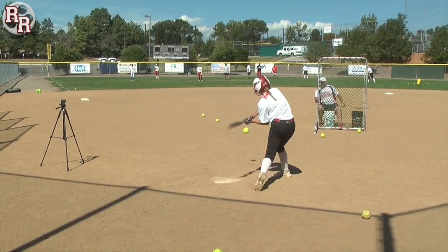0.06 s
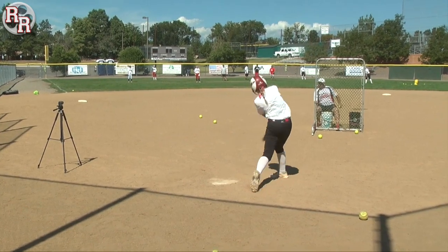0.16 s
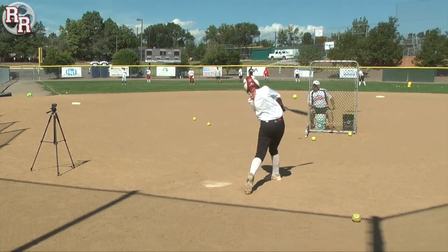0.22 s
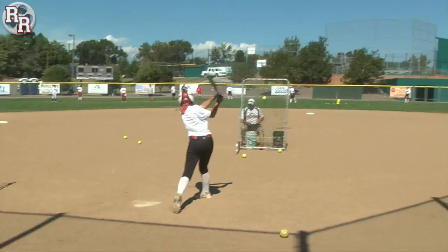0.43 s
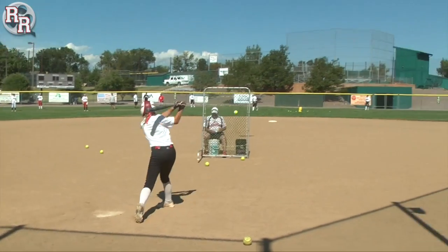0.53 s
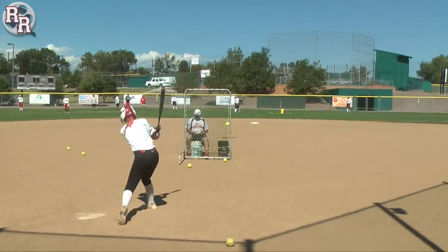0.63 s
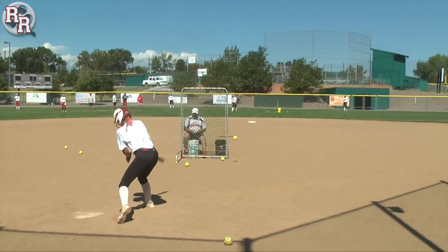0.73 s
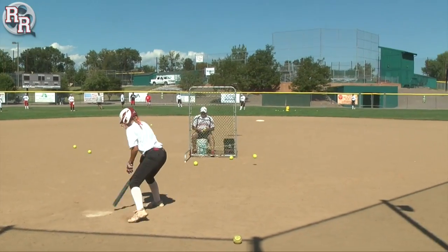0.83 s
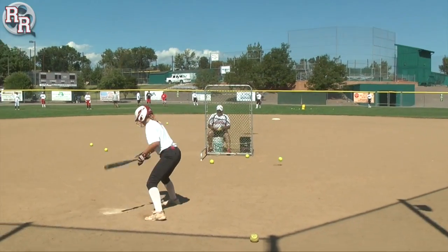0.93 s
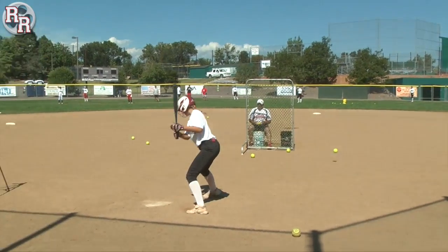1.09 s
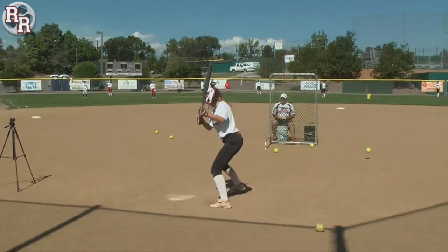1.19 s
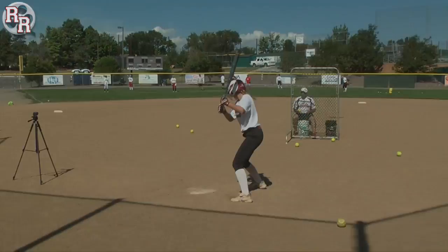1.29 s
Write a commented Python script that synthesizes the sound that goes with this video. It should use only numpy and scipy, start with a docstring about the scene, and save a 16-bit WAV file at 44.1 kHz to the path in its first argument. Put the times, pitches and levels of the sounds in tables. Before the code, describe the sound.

A bat hits a softball with a loud, close crack and a brief ring on an open field. A sharp knock follows, loose metal fence fittings jingle, and something thuds softly on dirt over a faint hum.

```python
"""A softball bat cracks against the ball on an open dirt field, hot enough to overload a nearby mic.
The crack layers ringing barrel modes, the ball's dull push and a burst of contact noise; the backstop
slaps it back and the field adds a diffuse tail. A sharp knock follows, two loose metal fittings jingle
over dry rustles and shivering wire mesh, and something thuds on the dirt.
Under it all sits a bed of low motor hum, distant outdoor noise and a faint whirr."""
import sys
import numpy as np
from scipy import signal
from scipy.fft import rfft, irfft
from scipy.io import wavfile

SR = 44100
rng = np.random.default_rng(int(sys.argv[2]) if len(sys.argv) > 2 else 0)


def waveform_to_disk(signal):
    """Save audio, clipped to [-1, 1], as 16-bit WAV at the path in sys.argv[1]."""
    frames = np.transpose(np.atleast_2d(signal))
    scaled = np.clip(frames, -1, 1) * 32767
    samples = np.round(scaled).astype(np.int16)
    wavfile.write(sys.argv[1], SR, samples)


N = 59535
T = np.arange(N) / SR

# motor hum partials (harmonic number, level [dB])
HUM_PARTIALS = [(1, -51.5), (2, -50), (3, -50), (4, -56), (5, -54)]
# colours of the outdoor air and the distant whirr (frequency [Hz], relative density [dB])
AIR_COLOUR = [(20, -18.5), (40, -14), (60, -4), (115, 3.5), (170, -3), (270, 3.5), (480, -5.5), (720, -5),
              (1100, -13), (1500, -19.5), (2000, -21), (4000, -34), (8000, -44), (15000, -47.5)]
WHIRR_COLOUR = [(900, -35), (1250, -11), (1430, -7), (1560, -4.5), (1700, -16), (2300, -42)]
# fader rides for the air and the whirr (time [s], level [dB])
AIR_RIDE = [(0, -43), (.2, -42), (.5, -45.5), (.72, -45.5), (.9, -44.5), (1.08, -42.5), (1.22, -43.5),
            (1.35, -48)]
WHIRR_RIDE = [(0, -54.5), (.2, -52), (.55, -54.5), (.7, -60.5), (.98, -65), (1.12, -59), (1.28, -58.5),
              (1.35, -78)]
# colours of mesh hiss, scrapes and grit, and knocks (frequency [Hz], relative density [dB])
MESH_COLOUR = [(500, -16), (1300, -5), (2000, 5), (3300, 4), (4600, 0), (6000, -6.5), (10000, -20.5),
               (15000, -26)]
GRIT_COLOUR = [(300, -9.5), (900, -3.5), (2000, -1.5), (3500, 2.5), (5300, 2.5), (7500, 3.5), (10500, -5.5),
               (13000, -18.5), (16000, -25.5)]
KNOCK_COLOUR = [(100, -11), (500, -11), (1500, -18), (2200, 1.5), (2600, -4), (4000, -0.5), (5500, -7.5),
                (7200, -4.5), (10000, -12), (13000, -30), (16000, -34)]
# dry scrapes (time [s], level [dB], attack [s], t60 [s])
SCRAPE_CUES = [(.04, -64, .06, 0.23), (0.452, -34.5, 0.0089, 0.25), (0.515, -42, 0.0054, 0.18),
               (0.549, -37.5, 0.00055, 0.043), (.559, -38.5, 0.0016, 0.066), (0.592, -43.5, 0.0083, 0.16),
               (.64, -56, 0.0051, 0.24), (.74, -59, .015, 0.2), (0.782, -46.5, 0.00092, 0.0092),
               (1.13, -67.5, 0.013, 0.19)]
# touches of the fittings
# (time [s], pitch [Hz], level [dB], upper mode re lower [dB], attack [s], t60 [s], chatter [0-1])
JINGLE_CUES = [(.467, 4146, -37, -2, 0.011, 0.73, 0.83), (0.512, 4160, -31, -18, 0.02, 0.2, 0.16),
               (.5472, 3946, -25, -1.5, 0.0002, 0.23, 0.14), (0.591, 3946, -30.5, -15, .012, .26, 0.07),
               (.635, 3946, -54, 1.5, .004, 0.4, 0), (.652, 4120, -42, -18, 0.021, 0.34, 0.1),
               (.738, 4142, -41.5, -26, 0.013, 0.32, 0.04), (.835, 4168, -51.5, -19, 0.01, 0.42, 0.3),
               (.86, 3946, -56.5, -16, 0.023, 0.87, 0.4), (.965, 4170, -57, -18, 0.02, 0.57, 0.35),
               (1.105, 4180, -61, -16, 0.0084, 0.3, 0.1), (1.131, 3953, -49, -23.5, 0.021, .19, 0.09)]
# thuds on the dirt (time [s], level [dB], pitch [Hz], relative grit level [dB])
THUD_CUES = [(.4375, -29.5, 840, -38), (.584, -34.5, 930, -18), (0.592, -30.5, 864, -9.5),
             (1.0087, -21.5, 612, -28.5), (1.0203, -29.5, 530, -20), (1.023, -26.5, 543, -28)]
# body of a thud (ratio to pitch, relative level [dB], t60 [s])
THUD_MODES = [(.45, -10, 0.064), (1, 3.5, .016), (1.3, -13, 0.0076)]
# sharp knocks (time [s], click level [dB], splinter level [dB], splinter t60 [s])
KNOCK_CUES = [(.436, -38, -42.5, 0.037), (.4517, -11.5, -23, 0.017), (.4528, -18, -59, 0.05),
              (0.463, -14.5, -25.5, 0.025), (0.547, -37, -48, 0.015)]
# colour of the sound scattered by the field (frequency [Hz], relative density [dB])
TAIL_COLOUR = [(100, -18.5), (670, -10.5), (780, 9.5), (950, 2.5), (1110, 7), (1400, -13.5), (1800, -4.5),
               (2400, -6), (3300, -13), (4100, -7.5), (5200, -15), (7000, -11), (10000, -21.5),
               (15000, -39.5)]
# decay of that tail (frequency [Hz], t60 [s])
TAIL_DECAY = [(300, .4), (900, 0.33), (2000, 0.31), (4000, 0.3), (8000, .3), (15000, 0.75)]
# reflections off the backstop and fences (delay [s], gain [dB], high cut [Hz])
SLAP_TAPS = [(.0133, -3.5, 13000), (.0158, -18, 7050), (0.0185, -21, 2477), (0.033, -24.5, 5060),
             (0.0463, -24.5, 2800), (.0703, -27.5, 1170)]
# colour of the splintery contact noise (frequency [Hz], relative density [dB])
CRACK_COLOUR = [(40, -11.5), (250, -21), (420, -8), (540, -11.5), (670, -20), (800, -8), (1600, 8.5),
                (3200, -4), (4500, -1.5), (7000, -5), (11000, -6.5), (16000, -31)]
# the soft ball flattening on the barrel (frequency [Hz], relative level [dB], t60 [s])
PUSH_MODES = [(111, -17, 0.014), (457, -13, 0.0089)]
# ring of the barrel and ball (frequency [Hz], relative level [dB], t60 [s])
BAT_MODES = [(849, -0.5, 0.048), (1120, -6, 0.047), (1188, -3, 0.039), (1296, 0, 0.027), (1497, -0.5, 0.03),
             (1675, -11, .035), (1804, -3.5, 0.026), (2160, -12, 0.018), (2336, 0.5, 0.019),
             (2754, -9.5, 0.035), (4033, -5, 0.02), (4390, -4.5, .024), (4912, -9, .025), (5715, -6.5, .03),
             (7190, -11.5, 0.035)]

HIT_S = .234


def amp(db):
    """Decibels to gain."""
    return 10 ** (np.asarray(db) / 20)


def unit_rms(x):
    """Normalises to an rms of one."""
    return x / np.sqrt(np.mean(x ** 2) + 1e-20)


def curve_at(points, hz):
    """Reads a curve on a log-frequency axis."""
    f, value = np.transpose(points)
    return np.interp(np.log(hz + 1), np.log(f + 1), value)


def noise(colour):
    """Steady coloured noise at unit rms."""
    eq = amp(curve_at(colour, np.fft.rfftfreq(N, 1 / SR)))
    return unit_rms(irfft(rfft(rng.standard_normal(N)) * eq, N))


def wander(rate_hz):
    """A random modulator at unit rms, rolling off above the given rate."""
    rolloff = 1 + (np.fft.rfftfreq(N, 1 / SR) / rate_hz) ** 4
    return unit_rms(irfft(rfft(rng.standard_normal(N)) / rolloff, N))


def grainy_noise(colour, depth_db=3, grain_hz=491):
    """Coloured noise roughened by a fast flicker in level."""
    return unit_rms(noise(colour) * amp(depth_db * wander(grain_hz)))


def envelope(start, attack, t60):
    """Linear attack, then a decay of 60 dB every t60 seconds."""
    age = T - start
    rise = np.clip(age / max(attack, 1 / SR), 0, 1)
    return rise * np.exp(-np.log(1000) * np.maximum(age - attack, 0) / t60)


def filtered(x, hz, kind, order):
    """Causal low-pass or high-pass."""
    return signal.sosfilt(signal.butter(order, hz, kind, fs=SR, output="sos"), x)


def struck(modes, start, attack_s):
    """Damped sines set ringing by one impact."""
    return sum(amp(db) * envelope(start, attack_s, t60) * np.sin(2 * np.pi * hz * (T - start))
               for hz, db, t60 in modes)


def outdoor_bed():
    """Distant outdoor noise and a faint whirr, each on its own fader ride."""
    air = noise(AIR_COLOUR) * amp(np.interp(T, *np.transpose(AIR_RIDE)))
    whirr = noise(WHIRR_COLOUR) * amp(np.interp(T, *np.transpose(WHIRR_RIDE)))
    return air + whirr


def motor_hum(pitch_hz=70.1, drift=.004, waver_db=1.3, waver_hz=14):
    """A motor's low harmonics, wavering in pitch and level."""
    phase = 2 * np.pi * np.cumsum(pitch_hz * (1 + drift * wander(waver_hz))) / SR
    hum = np.zeros(N)
    for harmonic, db in HUM_PARTIALS:
        peak = np.sqrt(2) * amp(db + waver_db * wander(waver_hz))
        hum += peak * np.cos(round(harmonic) * phase + 2 * np.pi * rng.random())
    return hum


def wire_mesh(level_db=-55):
    """Wire mesh shivers: a faint hiss that swells and dies slowly."""
    return amp(level_db) * envelope(start=.45, attack=.38, t60=1) * grainy_noise(MESH_COLOUR)


def scrapes():
    """Dry, grainy rustles, most of them tucked under the jingling."""
    contour = sum(amp(db) * envelope(start, attack, t60) for start, db, attack, t60 in SCRAPE_CUES)
    return contour * grainy_noise(GRIT_COLOUR)


def chattering_mode(phase, chatter, rate_hz):
    """A mode blended between free ringing and the shake of rattling contact."""
    shaken = (wander(rate_hz) * np.sin(phase) + wander(rate_hz) * np.cos(phase)) / np.sqrt(2)
    return np.sqrt(1 - chatter) * np.sin(phase) + np.sqrt(chatter) * shaken


def fittings(drift=.00128, flutter_db=.13, flutter_hz=50, chatter_hz=113):
    """Each touch rings the two lowest modes of a loose metal ring, which flutter as it swings."""
    upper_ratio, upper_life = 2.806, .67  # pitch and t60 as multiples of the lower mode's
    out = np.zeros(N)
    for start, hz, db, upper_db, attack, t60, chatter in JINGLE_CUES:
        phase = 2 * np.pi * np.cumsum(hz * (1 + drift * wander(flutter_hz))) / SR
        lower = envelope(start, attack, t60) * chattering_mode(phase, chatter, chatter_hz)
        upper = chattering_mode(upper_ratio * phase, chatter, upper_ratio * chatter_hz)
        upper *= amp(upper_db) * envelope(start, attack, t60 * upper_life)
        out += amp(db - flutter_db * wander(flutter_hz)) * (lower + upper)
    return out


def dirt_thuds(high_cut_hz=1200):
    """Dull landings on dirt: heavily damped low modes with a spray of grit."""
    out, grit = np.zeros(N), noise(GRIT_COLOUR)
    for start, db, hz, grit_db in THUD_CUES:
        modes = [(hz * ratio, mode_db, t60) for ratio, mode_db, t60 in THUD_MODES]
        body = filtered(struck(modes, start, attack_s=.00042), high_cut_hz, "low", order=2)
        spray = amp(grit_db) * grit * envelope(start, attack=0, t60=.013)
        out += amp(db) * (body + spray)
    return out


def hard_click(colour):
    """A coloured click at unit peak; minimum phase packs its energy at the front."""
    log_gain = np.log(amp(curve_at(colour, abs(np.fft.fftfreq(N, 1 / SR)))))
    click = np.fft.ifft(np.exp(np.conj(signal.hilbert(log_gain)))).real
    return click / abs(click).max()


def knocks():
    """Hard, bright clicks, each trailed by a short splinter of noise."""
    click, splinter = hard_click(KNOCK_COLOUR), noise(KNOCK_COLOUR)
    out = np.zeros(N)
    for start, click_db, splinter_db, t60 in KNOCK_CUES:
        out += amp(click_db) * np.roll(click, round(start * SR))
        out += amp(splinter_db) * splinter * envelope(start, 0, t60)
    return out


def field_tail(gain_db=-20, predelay_s=.011, fade_in_s=.024):
    """The field scatters the crack into a noise tail, each band dying at its own speed."""
    start = HIT_S + predelay_s
    hz, t, bands = signal.stft(noise(TAIL_COLOUR), SR, nperseg=256)
    decay = np.exp(-np.log(1000) * np.maximum(t - start, 0) / curve_at(TAIL_DECAY, hz)[:, None])
    tail = signal.istft(bands * decay, SR, nperseg=256)[1][:N]
    fade_in = np.clip((T - start) / fade_in_s, 0, 1)
    return amp(gain_db) * fade_in * tail


def slapback(hit):
    """The backstop and fences throw back separate echoes, the far ones mostly duller."""
    return sum(amp(db) * np.interp(T - delay, T, filtered(hit, high_cut_hz, "low", order=2), left=0)
               for delay, db, high_cut_hz in SLAP_TAPS)


def bat_crack(gain_db=-3, attack_s=.0006, low_cut_hz=784, crack_db=1):
    """Bat meets ball: the barrel rings briefly, the ball's push adds weight, contact noise adds bite."""
    ring = filtered(struck(BAT_MODES, HIT_S, attack_s), low_cut_hz, "high", order=4)
    push = struck(PUSH_MODES, HIT_S, attack_s)
    crack = amp(crack_db) * envelope(HIT_S, attack=.00022, t60=.035) * noise(CRACK_COLOUR)
    return amp(gain_db) * (ring + push + crack)


def scene():
    """The mono mix at the mic: the hit in its space, the clatter after it and the bed."""
    hit = bat_crack()
    space = slapback(hit) + field_tail()
    clatter = knocks() + dirt_thuds() + fittings() + scrapes() + wire_mesh()
    return (hit + space + clatter + motor_hum() + outdoor_bed())[None]


def record(dry, high_cut_hz=16200):
    """The crack drives the input into soft clipping at full scale; a steep high cut trims the top."""
    clipped = dry / (1 + dry ** 8) ** (1 / 8)
    high_cut = signal.firwin(255, high_cut_hz, window=("kaiser", 9), fs=SR)
    return signal.oaconvolve(clipped, high_cut[None], "same")


dry = scene()
out = record(dry)
waveform_to_disk(out)
```